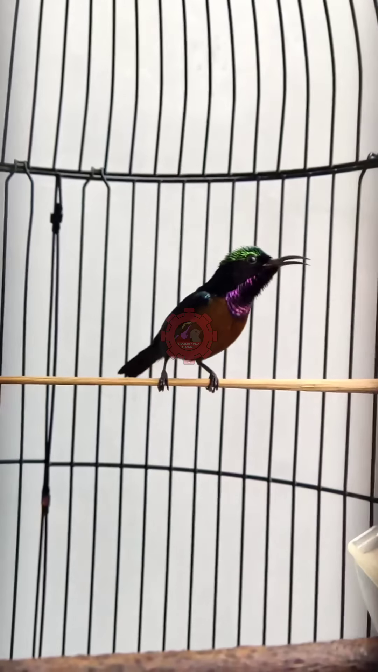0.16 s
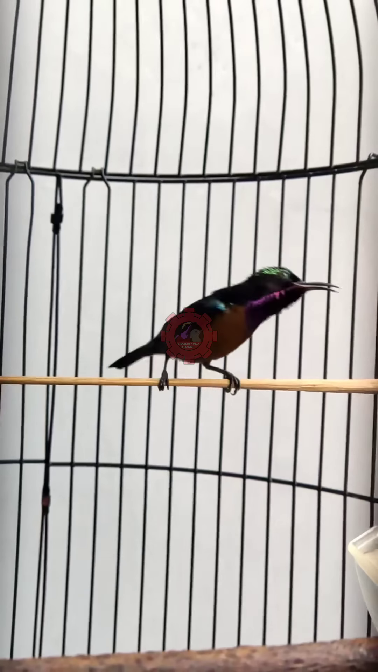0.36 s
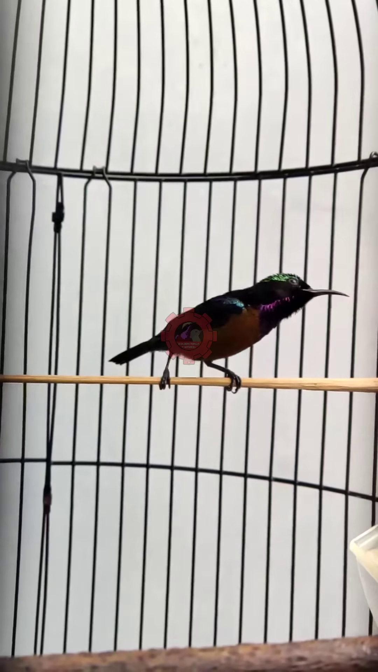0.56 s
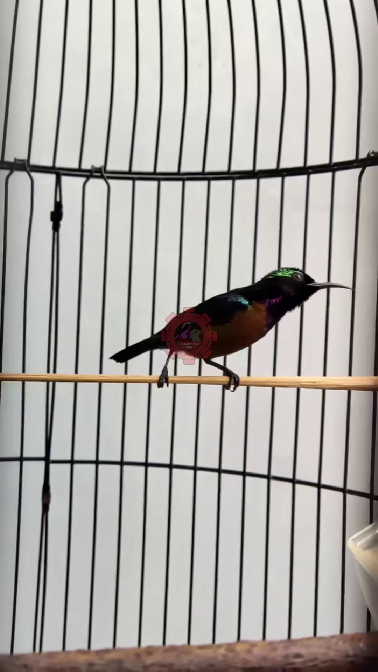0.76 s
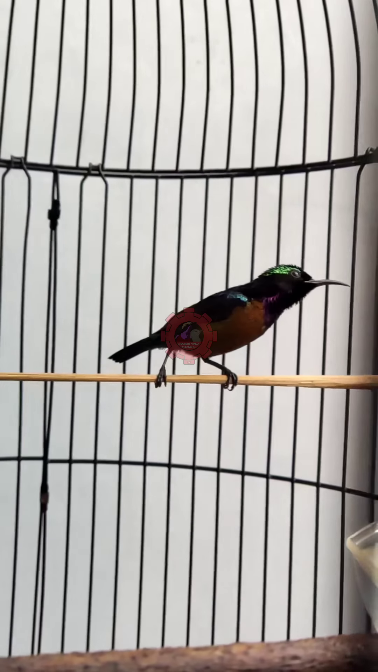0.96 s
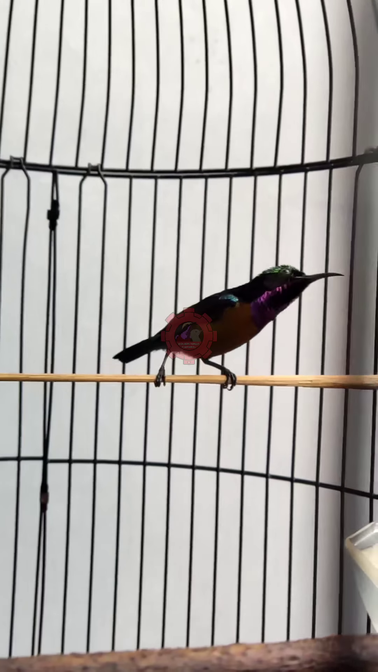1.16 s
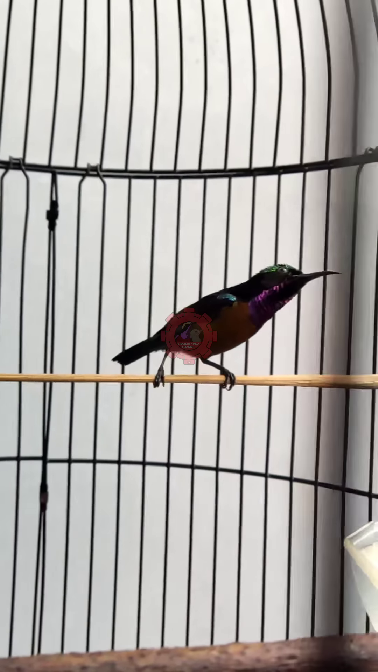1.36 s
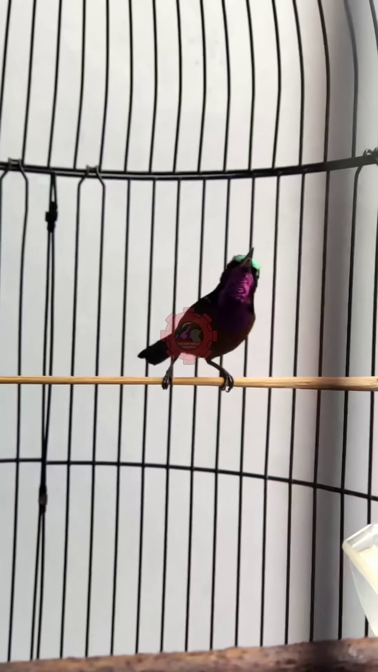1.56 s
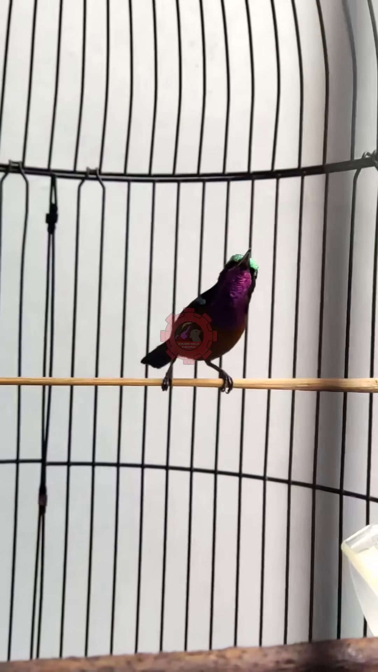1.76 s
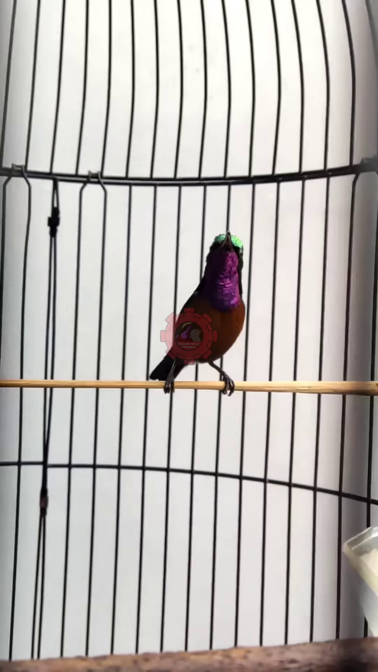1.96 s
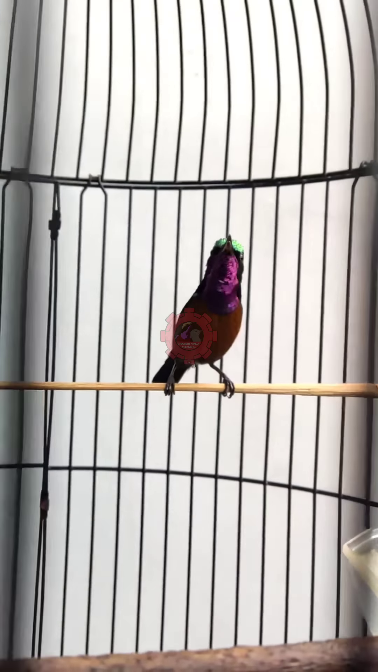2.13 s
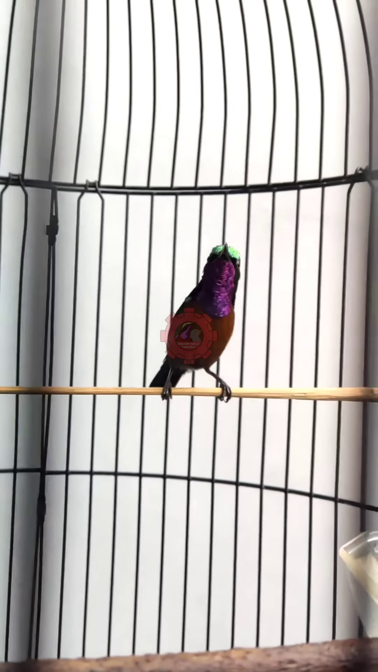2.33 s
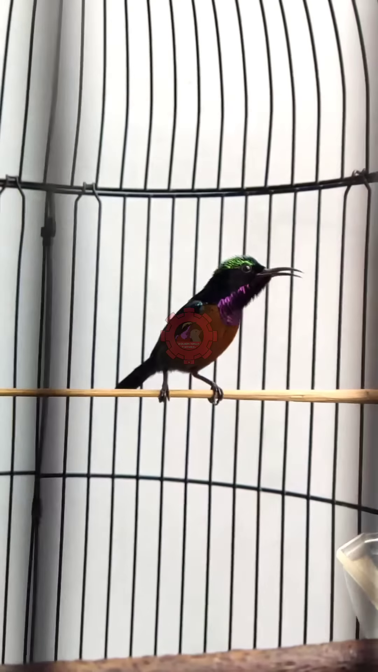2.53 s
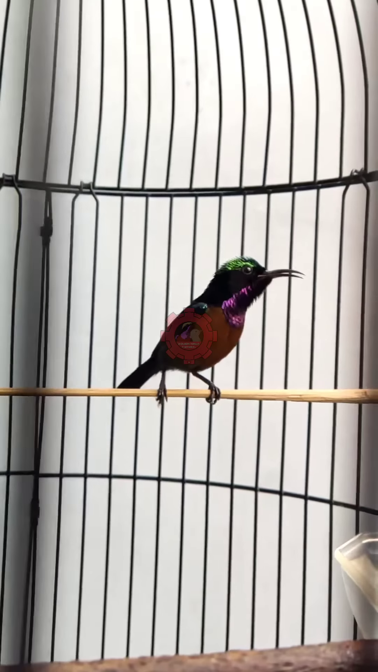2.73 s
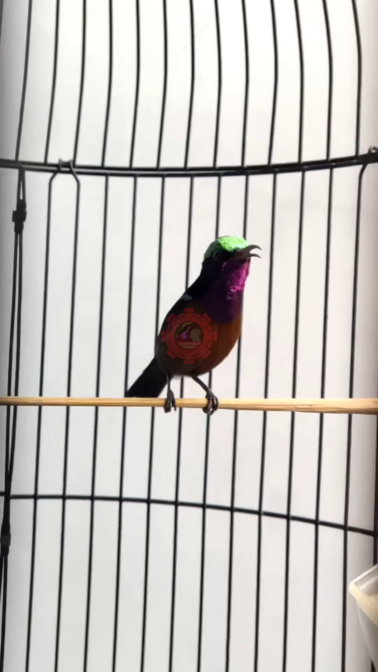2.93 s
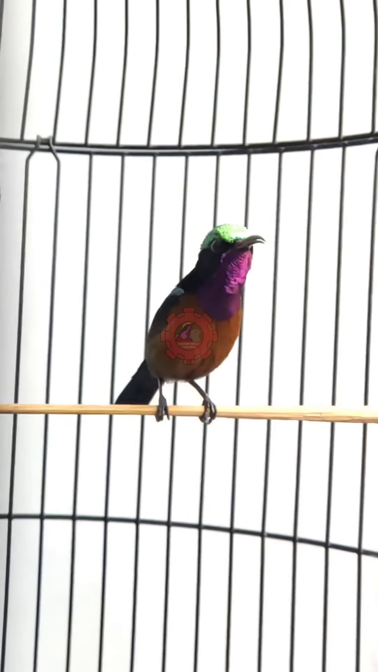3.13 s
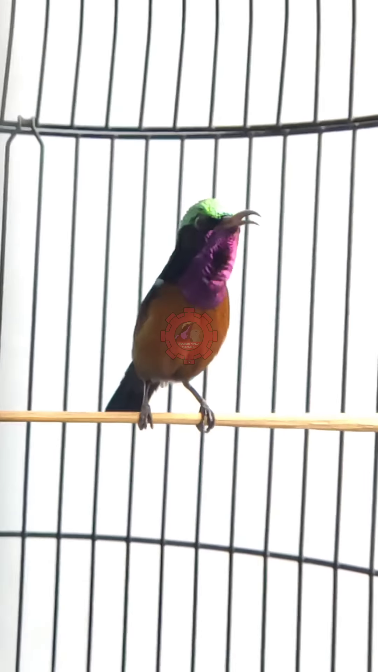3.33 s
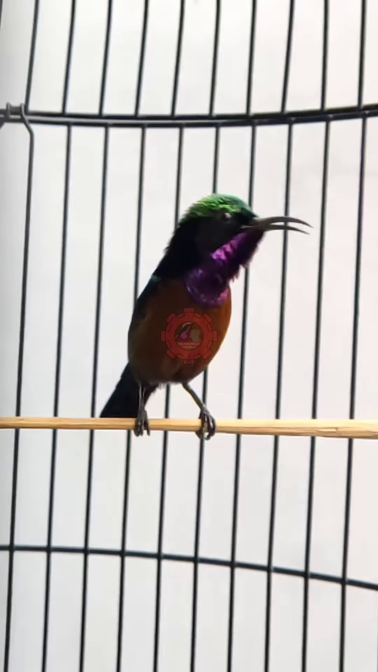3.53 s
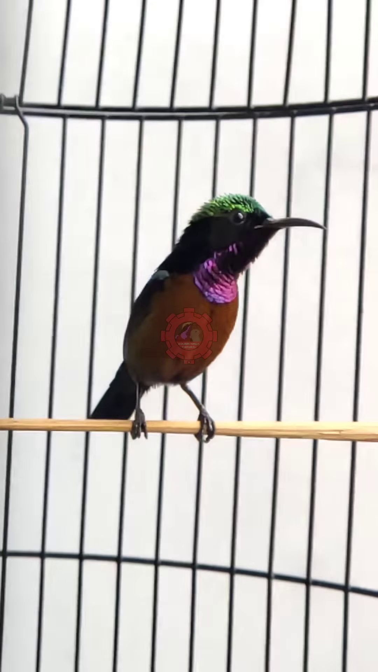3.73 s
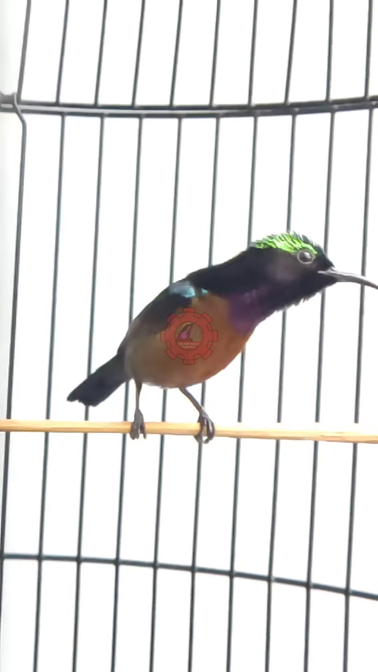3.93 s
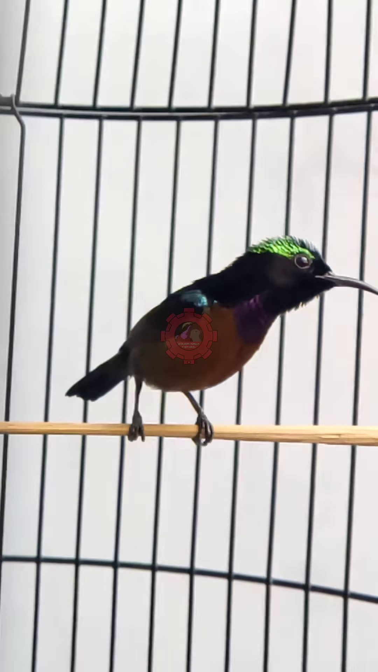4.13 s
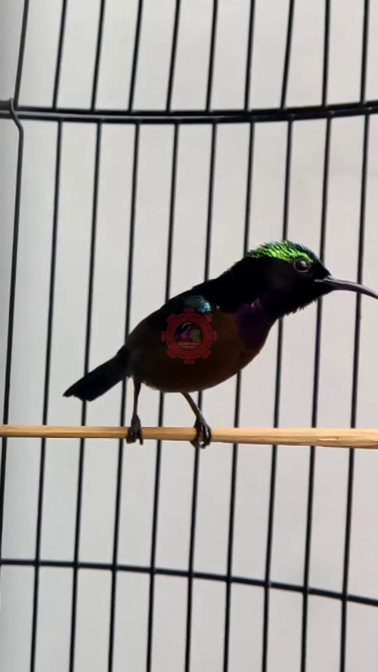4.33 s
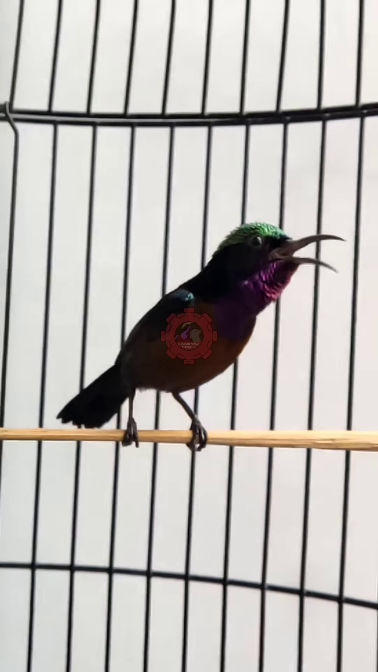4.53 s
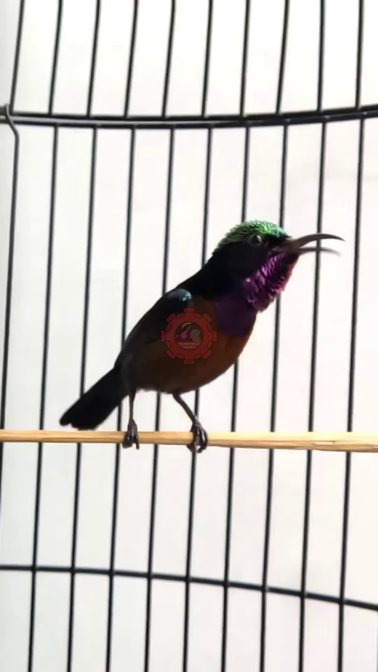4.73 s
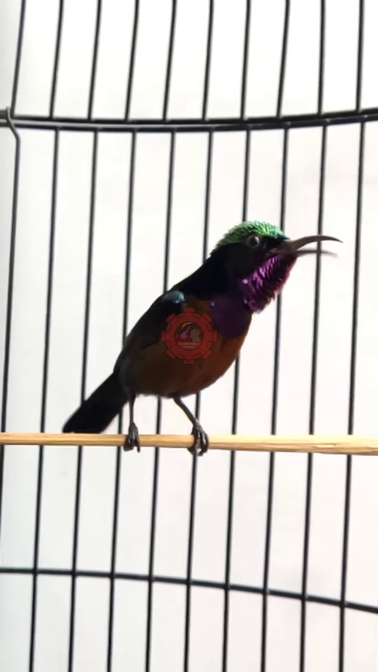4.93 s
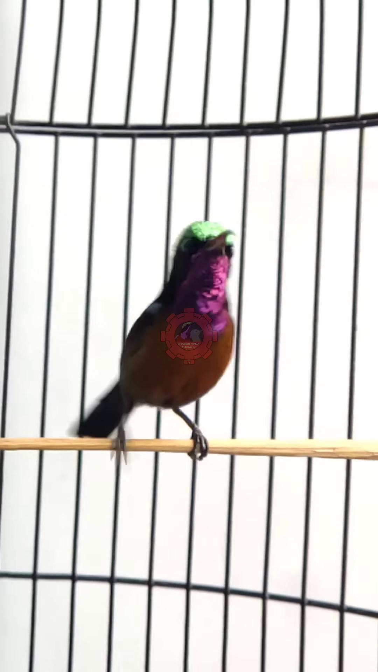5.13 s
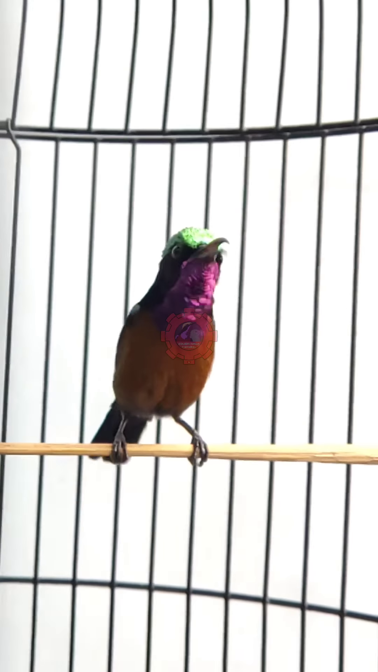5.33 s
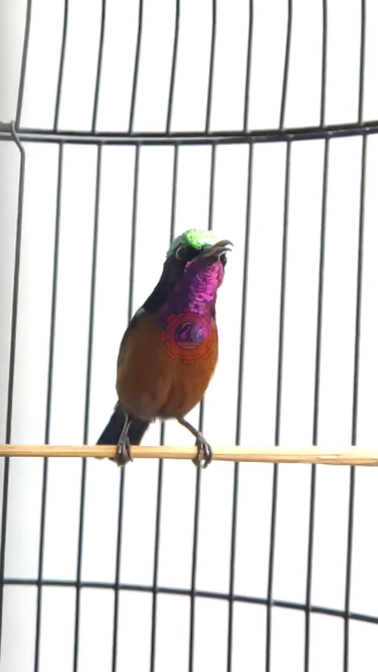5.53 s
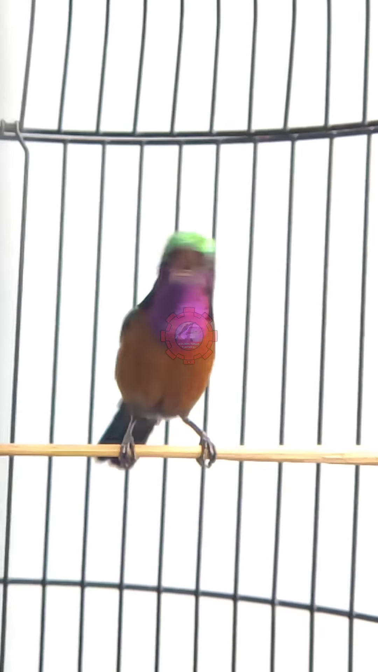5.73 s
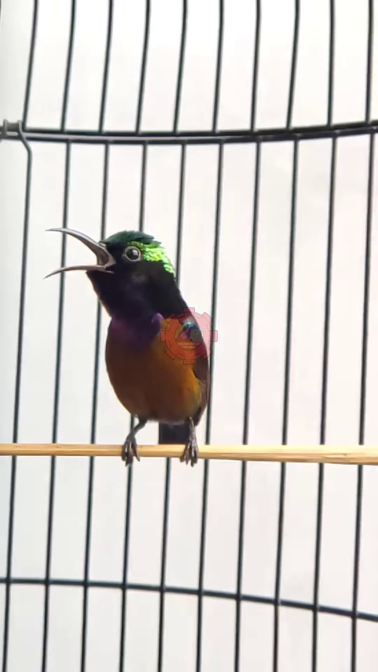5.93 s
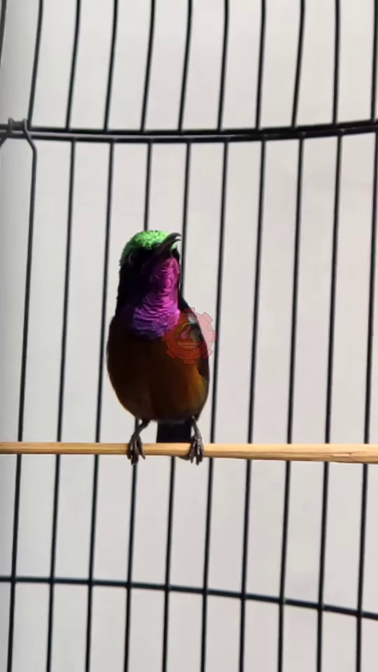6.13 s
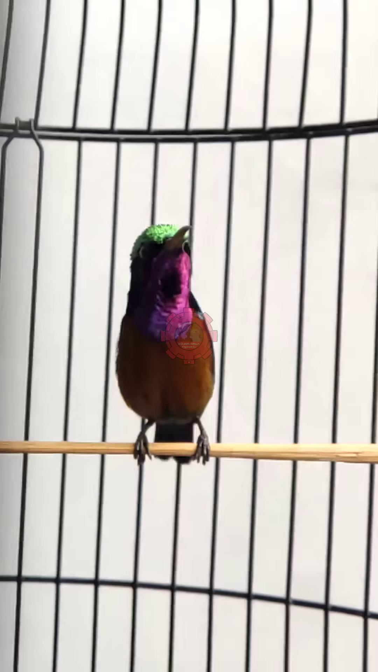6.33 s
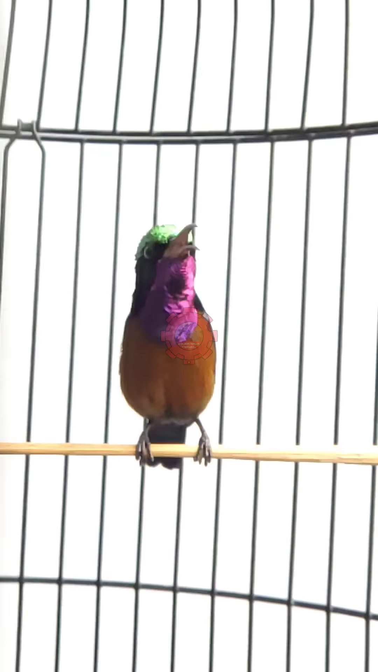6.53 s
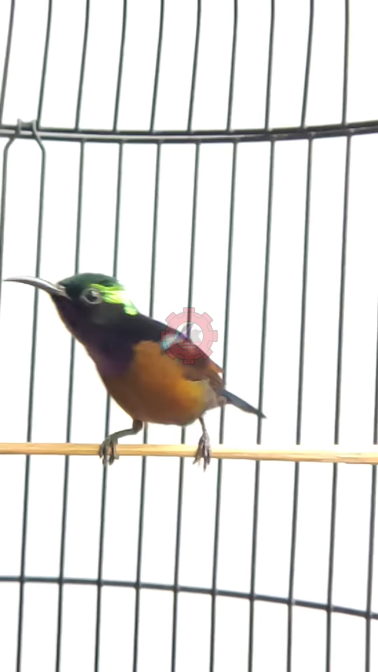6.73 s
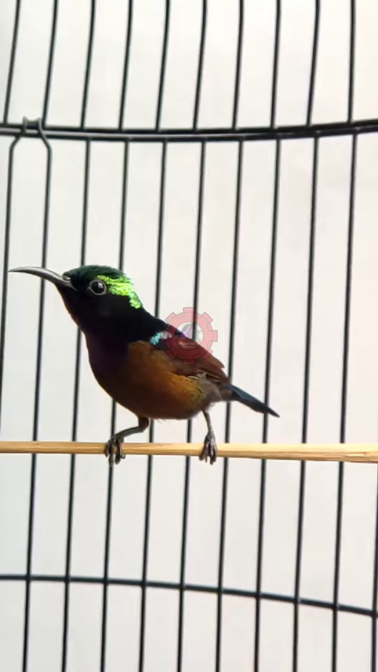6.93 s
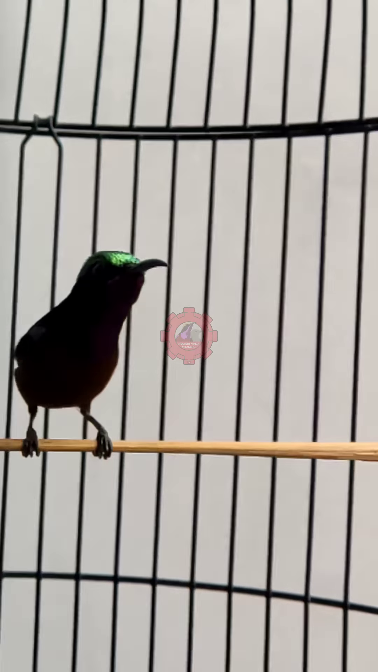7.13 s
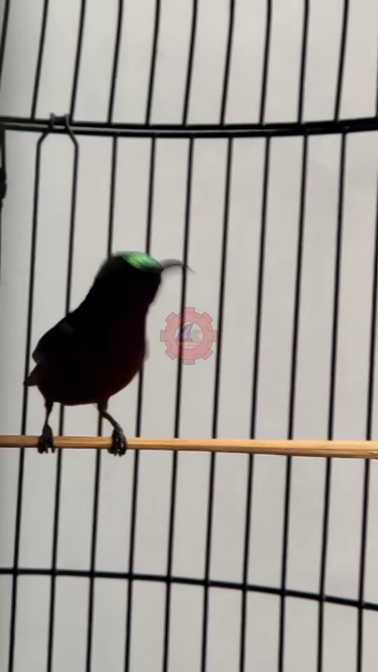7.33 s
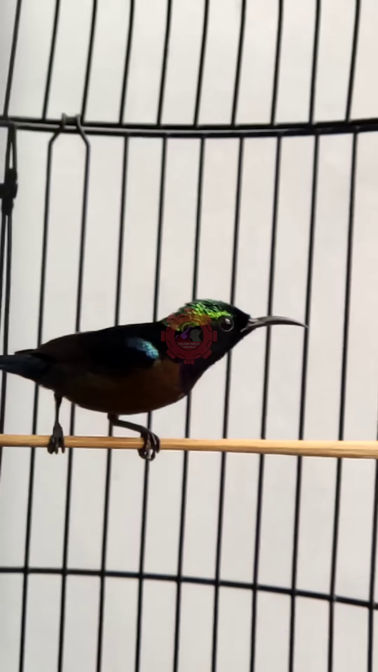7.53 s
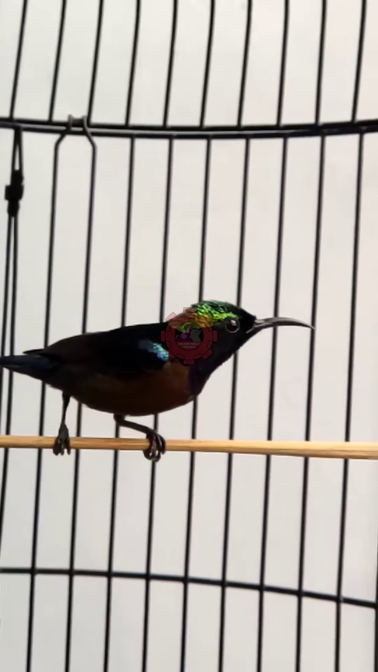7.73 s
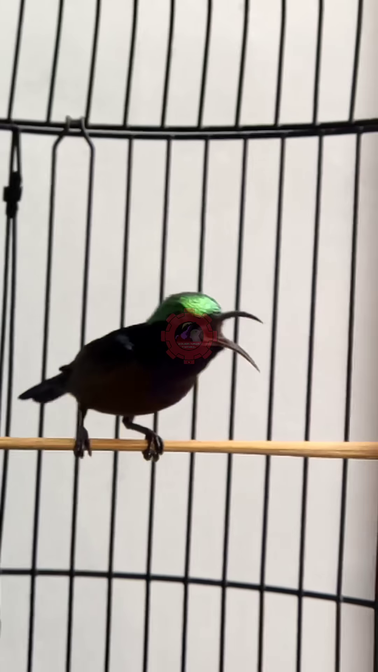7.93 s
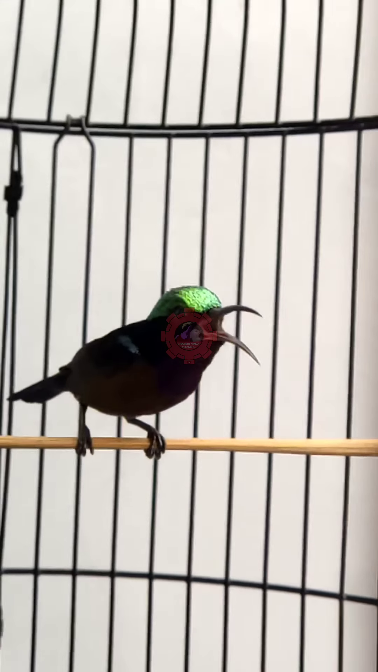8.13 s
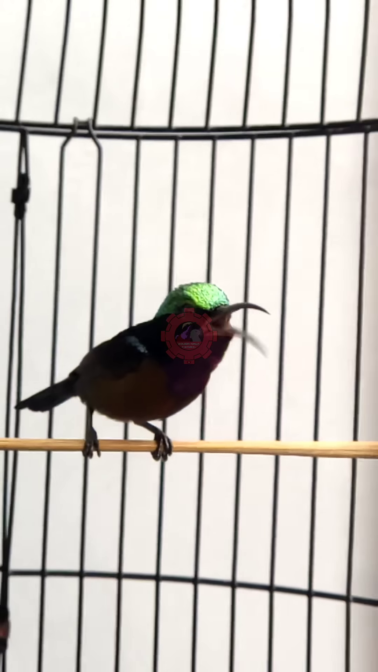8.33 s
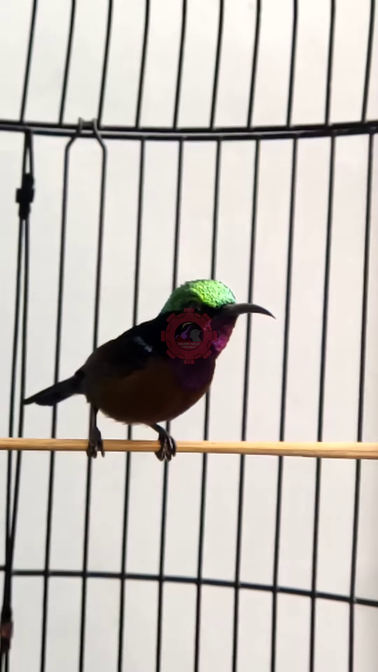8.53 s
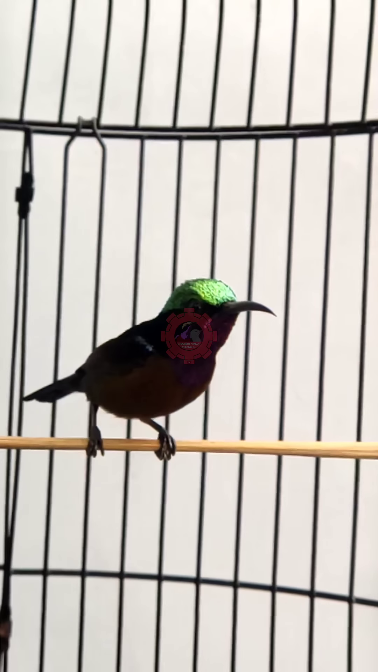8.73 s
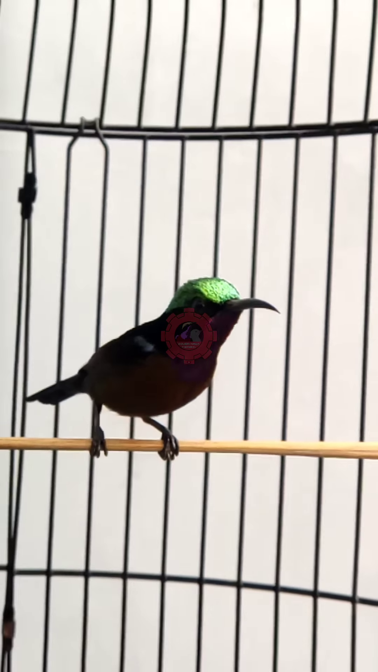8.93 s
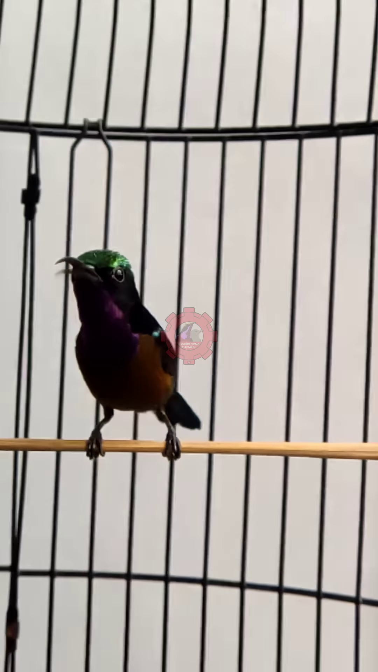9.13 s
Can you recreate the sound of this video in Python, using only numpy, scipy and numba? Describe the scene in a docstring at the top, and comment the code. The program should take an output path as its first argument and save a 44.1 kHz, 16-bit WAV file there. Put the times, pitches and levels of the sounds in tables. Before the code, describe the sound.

Close, piercing birdsong alternates rapid upward chirps with longer downward whistles over faint room rumble and hiss.

```python
"""A caged sunbird sings close to a phone's two microphones in a small, hard room.
Its syrinx whistles trills of quick rising notes and longer notes that fall in two steps.
Nearby surfaces comb each sweep differently at each microphone, and the room rings between notes.
Feathers rustle on the perch; further off a small bird answers, a dove coos once and something
whistles briefly. Under it all lie faint room noise, microphone hiss and one handling rumble."""
import sys
import numpy as np
from scipy import signal
from scipy.fft import rfft, irfft, next_fast_len
from scipy.io import wavfile
from scipy.ndimage import uniform_filter1d, minimum_filter1d, map_coordinates
from numba import njit

SR = 44100
rng = np.random.default_rng(int(sys.argv[2]) if len(sys.argv) > 2 else 0)


def unload_wav(signal):
    """Save mono or channel-first audio to the path in sys.argv[1] as 16-bit WAV at rate SR, clipped to [-1, 1]."""
    wavfile.write(
        sys.argv[1],
        SR,
        np.round(np.clip(np.atleast_2d(signal).T, -1, 1) * 32767).astype(np.int16),
    )


N = 408807
TIME = np.arange(N) / SR
PADDED = next_fast_len(N + SR // 10)


# Rising notes, close up:
# (time [s], length [s], top pitch [Hz], relative level [dB], overtone boost [dB])
RISING_NOTES = [(0.069, 0.056, 5223, -1.5, -5.5), (.166, 0.05, 5284, -5, -1.5), (0.26, 0.053, 5190, -5, -2),
                (0.363, 0.05, 5250, -3, 0.5), (0.461, 0.051, 5080, -6, -4.5), (2.541, 0.055, 5100, -2, 3.5),
                (2.634, .049, 5204, -3.5, -1.5), (2.722, 0.052, 5225, -6, -2),
                (2.817, 0.051, 5236, -2.5, -3.5), (2.922, 0.054, 5240, -2.5, 0.5),
                (3.008, 0.056, 5147, -3.5, -2.5), (3.108, 0.052, 5147, -2, -3.5),
                (4.473, 0.06, 5185, -0.5, 5), (4.567, 0.052, 5240, -2.5, 2),
                (4.667, 0.052, 5250, -4.5, 3.5), (4.774, 0.049, 5235, -3.5, 6),
                (4.866, 0.051, 5160, -2, -1), (4.968, 0.055, 5084, -3, -1.5), (5.081, 0.05, 5260, -4, 4),
                (5.182, 0.05, 5246, -0.5, 2), (5.274, 0.05, 5217, -4, -0.5), (5.392, 0.055, 5194, 0.5, 4),
                (5.514, 0.049, 5166, 1, 2), (5.628, 0.049, 5760, -5, 3.5), (6.213, .054, 5136, 1.5, 1.5),
                (6.318, .051, 5220, -2.5, -1), (6.415, 0.054, 5090, -4, -4.5),
                (6.542, 0.05, 5053, -1.5, -2.5), (9.044, 0.054, 5130, 1.5, 0.5),
                (9.137, .053, 5160, -2, -2.5), (9.233, 0.052, 5330, -3.5, -3)]
# Blips at the top of some rising notes: (time [s], pitch [Hz], relative level [dB])
BLIPS = [(0.205, 5900, -29.5), (2.672, 6040, -28), (2.961, 5970, -23.5), (3.147, 6300, -38),
         (4.812, 5980, -30.5), (5.313, 6250, -33.5)]
def trills():
    """Each note swells as it slides up in an S; rows are the fundamental and the overtones."""
    foot_hz, scoop_hz, scoop_s = 4074, 423.7, .004
    top_at, swell_db = .88, 15  # top_at: share of the note spent climbing
    out = np.zeros((2, N))
    previous_s = -1
    for s, length, top_hz, note_db, bright_db in RISING_NOTES:
        t = np.arange(int(length * SR)) / SR
        u = t / length
        span_hz = top_hz - foot_hz
        lag = .15 + .001 * span_hz  # a wider slide lingers longer at the foot
        climb = glide(u ** lag, 0, top_at)
        hz = foot_hz + span_hz * climb - scoop_hz * np.exp(-t / scoop_s)  # starts flat and settles
        hz *= 1 + .015 * (1 - climb) * walk(len(t), rate=75.6)  # no two slides are quite alike
        db = note_db - swell_db * np.maximum(1 - u / top_at, 0)
        db += envelope_db(t, attack_s=.012, release_s=.0098)
        add(out, s, syrinx(hz, db, second_db=bright_db - 23.5, third_db=bright_db - 23, tick_db=-41))
        if s - previous_s > .5:  # the first note of a phrase catches with a scratch
            add(out[0], s - .008, scratch(length=.011, db=-37.5))
        previous_s = s
    for s, hz, db in BLIPS:  # from the second side of the syrinx
        add(out[0], s, warble(length=.012, hz=hz, swing_hz=190, db=db))
    return out


# Falling notes, close up:
# (time [s], length [s], onset pitch [Hz], crest pitch [Hz], relative level [dB], overtone boost [dB])
FALLING_NOTES = [(1.508, 0.13, 7640, 7270, 0, 4), (1.681, 0.13, 7400, 7323, -2, 1.5),
                 (1.872, .12, 6640, 7230, -0.5, -3), (2.057, 0.13, 7000, 7250, -0.5, -4.5),
                 (3.265, 0.13, 6650, 7170, -1.5, 1), (3.465, 0.13, 7380, 7330, 0, -3.5),
                 (5.763, .12, 7010, 7210, 0.5, 2.5), (5.931, 0.13, 6850, 7500, -1.5, 3.5),
                 (7.943, 0.13, 7530, 7190, -2, 2.5), (8.114, .12, 7240, 7270, -1, 6.5),
                 (8.301, .12, 6320, 7300, -1, 4.5)]
# Drop, rebound and sink of each: (start [share of note], end [share of note], target pitch [Hz])
FALL_MOVES = [(0.143, 0.389, 5710), (0.418, .59, 6168), (.55, 0.859, 4619)]
def falling_notes():
    """A loud high crest drops to a dip, lifts again and sinks away as the pressure fades."""
    settle_s, sag_from, sag_hz_per_s = .005, .79, 12600  # sag_from: share of the note
    out = np.zeros((2, N))
    for s, length, onset_hz, crest_hz, note_db, bright_db in FALLING_NOTES:
        t = np.arange(int(length * SR)) / SR
        u = t / length
        hz = crest_hz + (onset_hz - crest_hz) * np.exp(-t / settle_s)
        for start, end, target_hz in FALL_MOVES:
            hz += (target_hz - hz) * glide(u, start, end)
        hz -= sag_hz_per_s * np.maximum(t - sag_from * length, 0)
        # pressure builds along the crest, then eases with the drop and again with the sink
        drop, _, sink = (glide(u, start, end) for start, end, _ in FALL_MOVES)
        pressure_db = 5 * (glide(u, .1, .22) - 1) - 8 * drop - 5.5 * sink
        db = note_db + pressure_db + envelope_db(t, attack_s=.021, release_s=.006)
        add(out, s, syrinx(hz, db, second_db=bright_db - 23, third_db=bright_db - 25.5, tick_db=-39.5))
    return out


def syrinx(hz, db, second_db, third_db, tick_db):
    """One whistle with a slight tremor; rows are the fundamental and its weak, glinting overtones."""
    size = len(hz)
    trembling_hz = hz * (1 + .0068 * walk(size, rate=501.5))
    phase = 2 * np.pi * np.cumsum(trembling_hz) / SR
    loudness = np.sqrt(2) * undb(db + 1.1 * walk(size, rate=300)) * signal.windows.tukey(size, .05)
    rough_phase = phase + .11 * walk(size, rate=1800)
    second = undb(second_db) * np.sin(2 * rough_phase)
    third = undb(third_db) * np.sin(3 * rough_phase) * (3 * hz < SR / 2)
    glint = undb(8 * np.tanh(walk(size, rate=180)))
    # a faint tick of noise at each note's loudest point
    tick = undb(tick_db) * loudness ** 2 * rng.standard_normal(size)
    return loudness * np.array([np.sin(phase) + tick, (second + third) * glint])


# Throat resonance on the fundamental: (frequency [Hz], gain [dB])
THROAT_RESONANCE = [(1500, -3.5), (3700, 7.5), (4500, 0.5), (4900, -1), (5140, -0.5), (5500, 0),
                    (7200, 4.5)]
# Overtones as the beak beams them at each microphone: (frequency [Hz], gain [dB])
BEAM_LEFT = [(7500, -3), (8500, -6.5), (10300, 3.5), (11000, 7), (11700, 1.5), (13000, -2), (15500, -10)]
BEAM_RIGHT = [(7500, 0.5), (8500, 13), (10300, -5.5), (11000, -12), (11700, -15), (13000, -15),
              (15500, -11)]
# Cage-corner reflections at each microphone: (delay [ms], amplitude [share of direct sound])
CORNER_LEFT = [(.312, .296), (.992, .118), (1.34, .239), (1.8, .12)]
CORNER_RIGHT = [(.309, .244), (.414, .359), (1.455, .168), (1.882, .127)]
def sunbird():
    """The song at close range: the cage corner reflects it, the bars scatter it, the room rings."""
    tone, overtones = undb(1) * (trills() + falling_notes())  # loud enough to drive the limiter
    tone = colour(tone, THROAT_RESONANCE)
    near = np.array([reflect(tone, CORNER_LEFT, lead_ms=0), reflect(tone, CORNER_RIGHT, lead_ms=.161)])
    beamed = np.array([colour(overtones, BEAM_LEFT), colour(overtones, BEAM_RIGHT)])
    spill = beamed.mean(axis=0)  # overtones that miss the microphones and fill the room
    bars = room(spill, t60=.03, delay_s=.00035, wet_db=-4)
    walls = room(tone + spill, t60=.09, delay_s=.005, wet_db=-10.5)
    ring = room(tone + spill, t60=.28, delay_s=.018, wet_db=-20)
    return near + undb(-3.5) * beamed + bars + walls + ring


def reflect(x, echoes, lead_ms):
    """Direct sound and first reflections at one microphone; their comb makes every sweep throb."""
    phase_per_ms = -2j * np.pi * np.fft.rfftfreq(PADDED, 1 / SR) / 1000
    arriving = rfft(x, PADDED) * np.exp(-phase_per_ms * lead_ms)
    reflections = sum(share * np.exp(phase_per_ms * ms) for ms, share in echoes)
    direct = irfft(arriving, PADDED)[:N]
    mirrored = irfft(arriving * reflections, PADDED)[:N]
    drift_s = 37e-6 * walk(N, rate=4)  # the bird sways, so the reflections drift
    return direct + map_coordinates(mirrored, [(TIME + drift_s) * SR], mode="nearest")


# Rustles in the cage: (time [s], length [s], relative level [dB])
PERCH_RUSTLES = [(3.81, 0.054, -46), (3.958, 0.057, -46), (4.1, 0.041, -45), (4.25, .05, -49),
                 (6.725, .045, -46), (6.884, 0.032, -48), (7.015, .06, -47), (7.42, 0.035, -52),
                 (8.518, 0.046, -44), (8.613, 0.18, -46.5), (8.846, 0.058, -45)]
def feathers():
    """Feathers rustle faintly as the bird shifts on its perch."""
    rustles = np.zeros(N)
    for s, length, db in PERCH_RUSTLES:
        add(rustles, s, scratch(length, db))
    rustles = colour(rustles, [(1000, -6), (4000, 0), (15000, -7)])
    return room(rustles, t60=.15, delay_s=.001, wet_db=0)


# A small bird, further off:
# (time [s], length [s], centre pitch [Hz], pitch swing [Hz], relative level [dB])
FAR_CHIRPS = [(0.657, 0.076, 7414, 100, -38.5), (0.696, 0.1, 5570, 510, -51.5),
              (0.961, 0.057, 7490, 198, -43.5), (1.006, 0.067, 6460, 670, -46.5),
              (1.195, 0.1, 5520, 964, -41.5), (3.594, 0.066, 7640, 128, -41.5),
              (3.836, 0.071, 7405, 102, -37.5), (4.165, 0.097, 5580, 1000, -40),
              (7.734, 0.063, 7400, 136, -38.5), (7.775, 0.085, 5240, 667, -48)]
def far_bird_and_whistle():
    """The answering bird and one lower whistle reach the microphones only as reverberation."""
    calls = np.zeros(N)
    for s, length, hz, swing_hz, db in FAR_CHIRPS:
        add(calls, s, warble(length, hz, swing_hz, db))
    add(calls, 2.26, warble(length=.1, hz=1690, swing_hz=7.9, db=-57.5))  # the whistle
    return room(calls, t60=.54, delay_s=.0014, wet_db=3.5)


# Contour of one distant coo: (time [s], pitch [Hz], level [dB])
COO_CONTOUR = [(8.51, 264, -55), (8.548, 293, -47), (8.661, 394, -47.5), (8.781, 396.5, -53.5),
               (8.881, 329.5, -48), (8.96, 281, -64)]
def dove():
    """A pure low tone arches up and down in pitch, heard directly and off the walls."""
    s, hz, db = np.transpose(COO_CONTOUR)
    loudness = np.sqrt(2) * np.interp(TIME, s, undb(db), left=0, right=0)
    phase = 2 * np.pi * np.cumsum(np.interp(TIME, s, hz)) / SR
    coo = loudness * np.sin(phase)
    return coo + room(coo, t60=.43, delay_s=.008, wet_db=-3.5)


# Room tone all around: (frequency [Hz], relative level [dB])
ROOM_SPECTRUM = [(15, -53.5), (25, 4), (109, -3), (452, -18.5), (1240, -28), (1560, -33.5), (3500, -46),
                 (4550, -66), (7700, -120)]
def room_tone():
    """A low, gently wavering rumble, mostly shared by both microphones."""
    noise = rng.standard_normal(N) + .8 * rng.standard_normal((2, N))
    return level(colour(noise, ROOM_SPECTRUM) * undb(walk(N, rate=5)), db=-51)


# Self-noise of the microphones: (frequency [Hz], relative level [dB])
HISS_SPECTRUM = [(2500, -15.5), (3800, -16), (4900, -2), (6000, -20), (7100, -7), (8000, -13), (9100, 0.5),
                 (10500, -17), (13000, -22), (15500, -26)]
def microphone_hiss():
    """Each microphone adds its own steady hiss."""
    return level(colour(rng.standard_normal((2, N)), HISS_SPECTRUM), db=-49)


def handling():
    """A brief low rumble as the phone is moved."""
    rumble = colour(rng.standard_normal(N), [(45, -.5), (100, -23), (3000, -47)])
    swell = np.exp(-((TIME - 3.03) / .3) ** 2)
    return level(rumble, db=-41.5) * swell


def room(x, t60, delay_s, wet_db):
    """A diffuse tail, different at each microphone, that dies by 60 dB in t60 seconds."""
    t = np.arange(SR) / SR
    tail = rng.standard_normal((2, SR)) * np.exp(-np.log(1000) * t / t60) * (t > delay_s)
    tail /= np.sqrt(np.sum(tail ** 2, axis=1, keepdims=True))
    return undb(wet_db) * signal.fftconvolve(x[None], tail, axes=1)[:, :N]


def warble(length, hz, swing_hz, db):
    """A soft-edged tone whose pitch shakes quickly about a centre while it sinks."""
    u = np.linspace(0, 1, int(length * SR))
    pitch = hz + swing_hz * np.tanh(walk(len(u), rate=600) + .5 - u)
    loudness = np.sqrt(2) * undb(db) * signal.windows.tukey(len(u), .4)
    return loudness * np.sin(2 * np.pi * np.cumsum(pitch) / SR)


def scratch(length, db):
    """A short swell of noise."""
    size = int(length * SR)
    return undb(db) * np.hanning(size) * rng.standard_normal(size)


def glide(u, start, end):
    """A muscle movement: eases from 0 to 1 between two shares of the note."""
    return np.sin(np.pi / 2 * np.clip((u - start) / (end - start), 0, 1)) ** 2


def envelope_db(t, attack_s, release_s):
    """Attack, hold and release of a note."""
    gain = np.minimum(t / attack_s, 1) * np.minimum((t[-1] - t) / release_s, 1)
    return 20 * np.log10(np.maximum(gain, .01))


def walk(size, rate):
    """A random wander with a spread near 1 that turns rate times a second."""
    return np.interp(np.arange(size) * rate / SR, np.arange(size), rng.standard_normal(size))


def colour(x, points):
    """Filter by a curve of (frequency [Hz], gain [dB]) points."""
    hz, db = np.transpose(points)
    bins = np.maximum(np.fft.rfftfreq(PADDED, 1 / SR), 1)
    gain = undb(np.interp(np.log(bins), np.log(hz), db))
    return irfft(rfft(x, PADDED) * gain, PADDED)[..., :N]


def add(track, s, sound):
    """Mix a sound into a track from s seconds on."""
    start = int(s * SR)
    part = sound[..., :max(N - start, 0)]
    track[..., start:start + part.shape[-1]] += part


def undb(db):
    """Decibels to gain."""
    return 10 ** (np.asarray(db) / 20)


def level(x, db):
    """Scale to an rms level."""
    return x * undb(db) / np.sqrt(np.mean(x ** 2))


@njit
def follow(x, release):
    """A peak follower that rises at once and falls slowly."""
    out, peak = np.empty(len(x)), 0.
    for i in range(len(x)):
        peak = max(x[i], peak * release)
        out[i] = peak
    return out


def limit(x, ceiling, release_s):
    """A limiter that looks a little ahead and ducks everything under the loudest notes."""
    peak = follow(np.abs(x).max(axis=0), np.exp(-1 / (release_s * SR)))
    gain = np.minimum(1, ceiling / (peak + 1e-9))
    return x * uniform_filter1d(minimum_filter1d(gain, size=200), size=200)


def scene():
    """Everything at the two microphones, with the sunbird in front."""
    voices = sunbird() + far_bird_and_whistle() + dove()
    return voices + feathers() + room_tone() + microphone_hiss() + handling()


def record(dry):
    """The wave is slightly bent and limited; the loudest peaks clip with a faint tick; the top is cut."""
    bent = dry - .016 * dry ** 2
    held = limit(bent, ceiling=1.05, release_s=.12)
    lowpass = signal.ellip(10, .1, 70, 15500, fs=SR, output="sos")
    return signal.sosfilt(lowpass, np.clip(held, -1, 1))


dry = scene()
out = record(dry)
unload_wav(out)
```